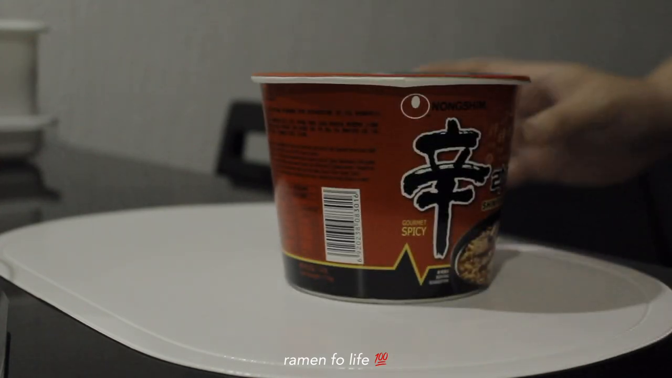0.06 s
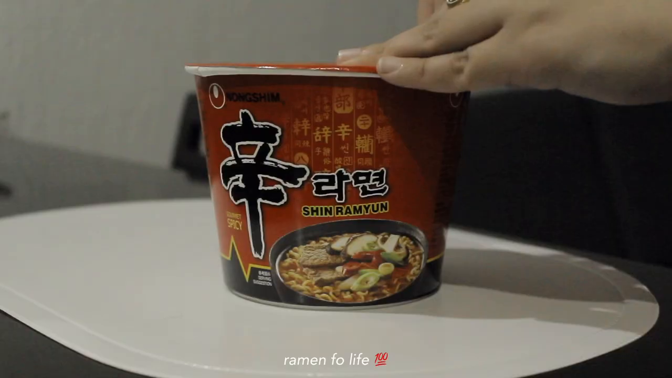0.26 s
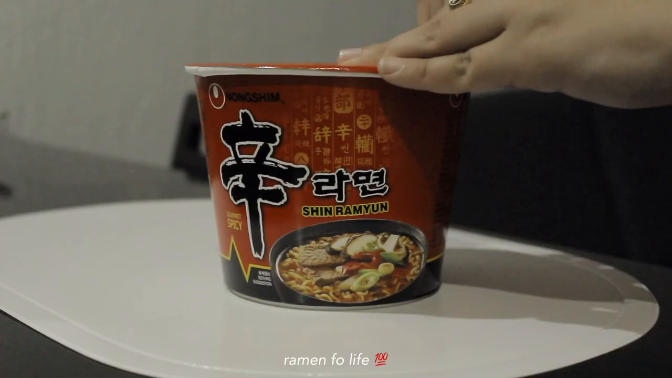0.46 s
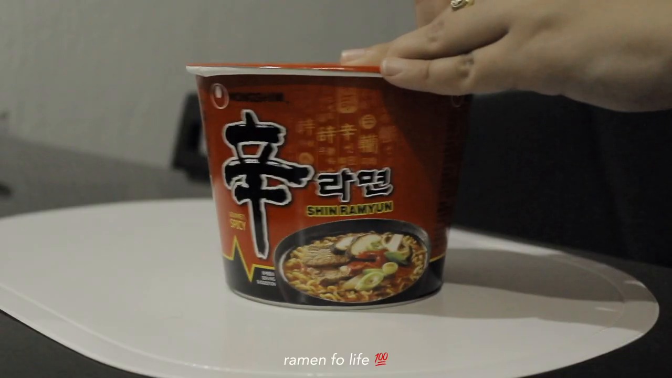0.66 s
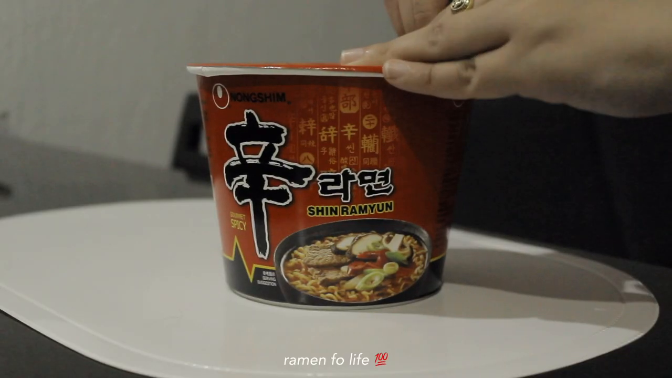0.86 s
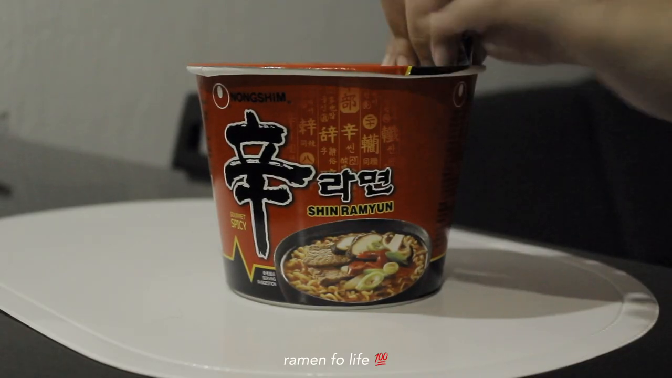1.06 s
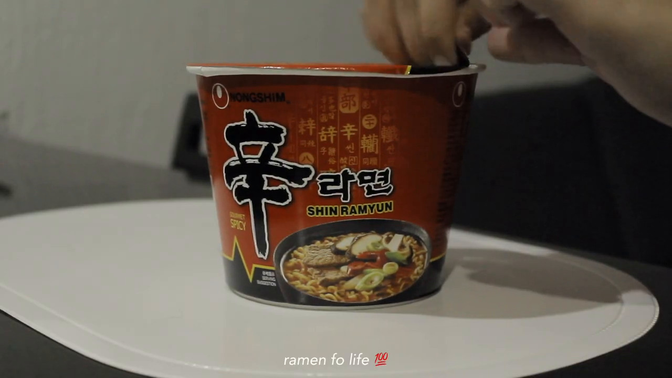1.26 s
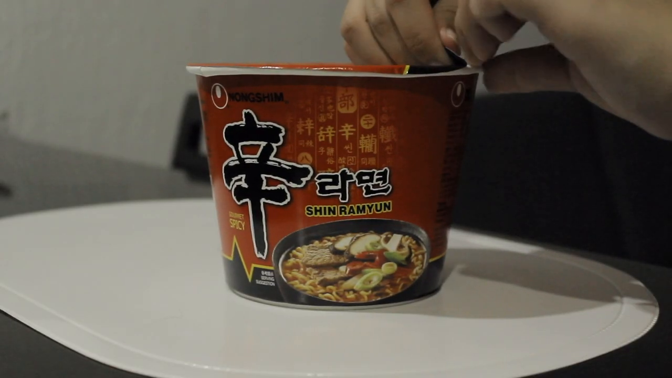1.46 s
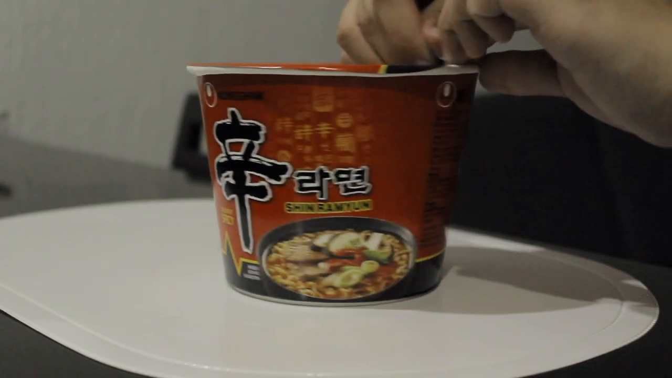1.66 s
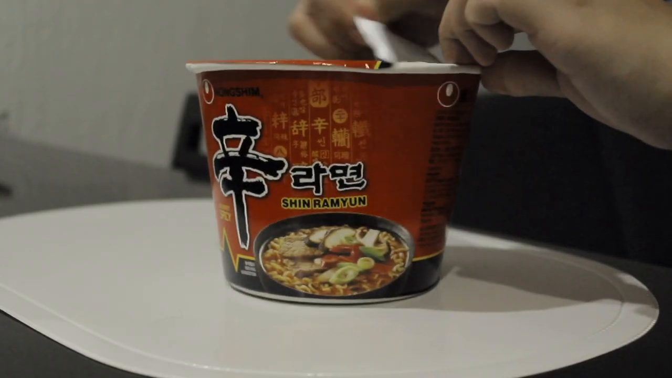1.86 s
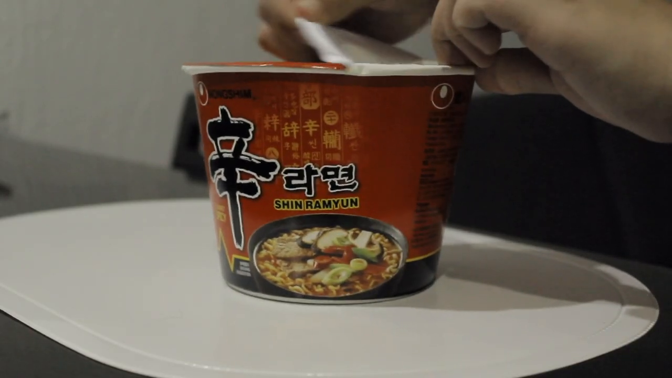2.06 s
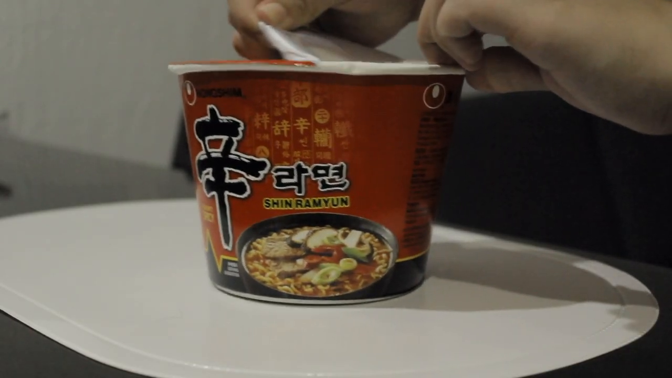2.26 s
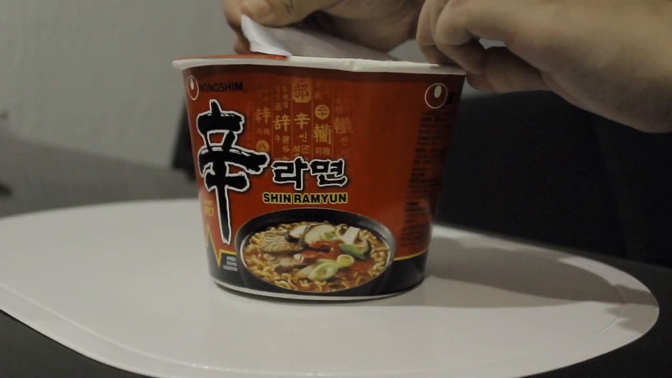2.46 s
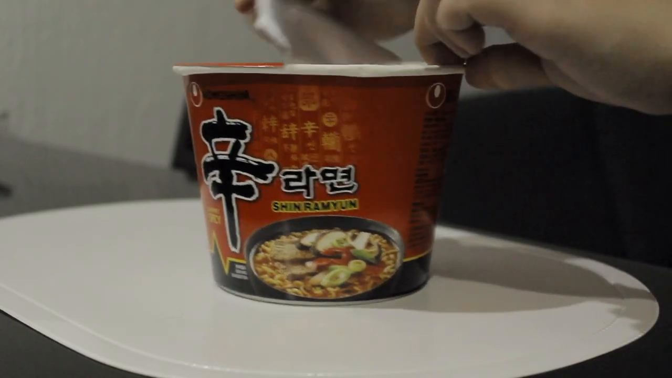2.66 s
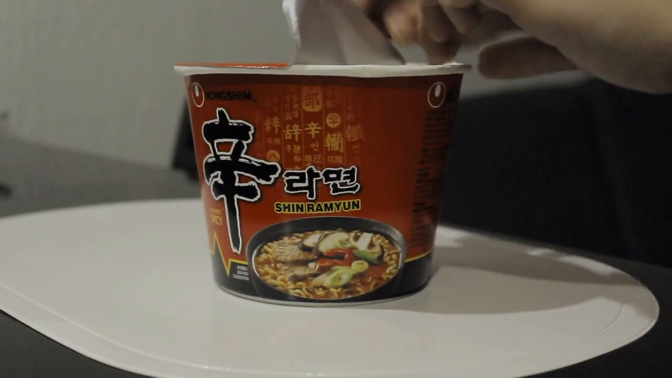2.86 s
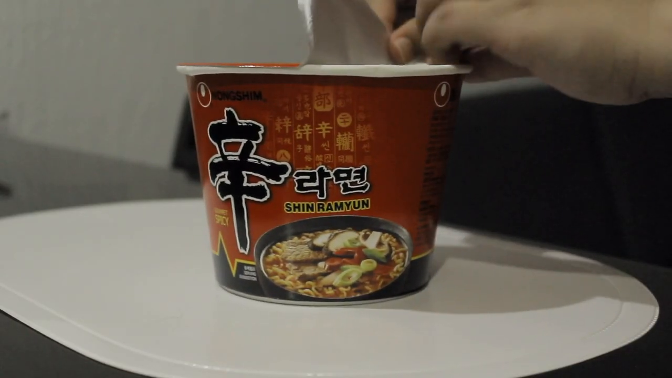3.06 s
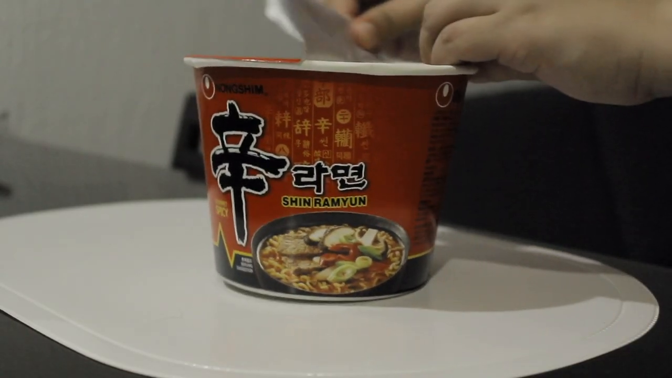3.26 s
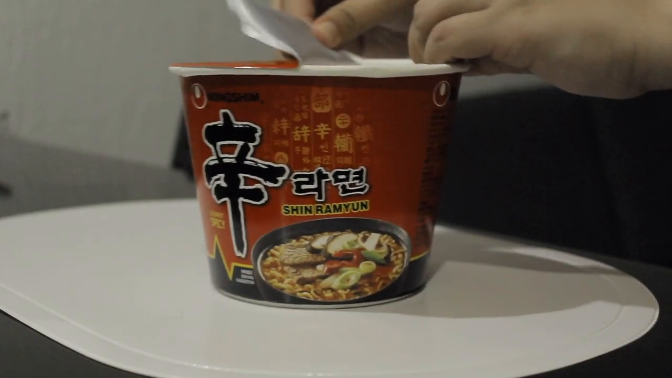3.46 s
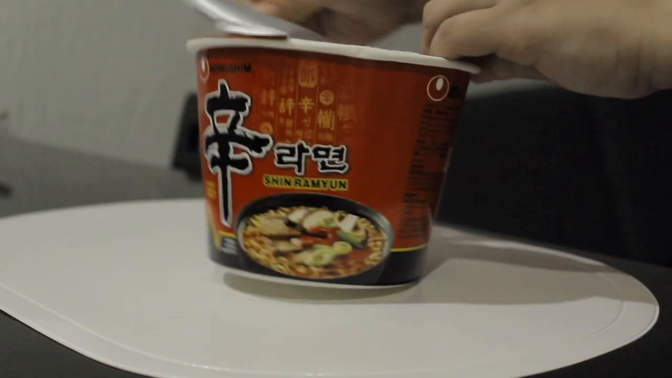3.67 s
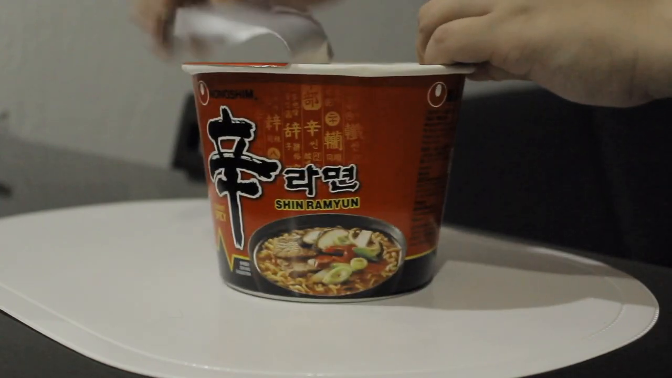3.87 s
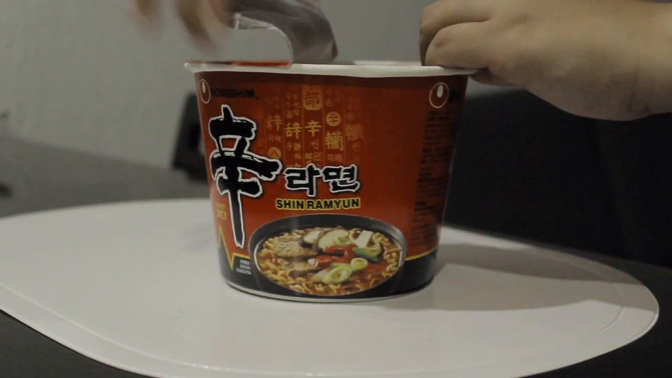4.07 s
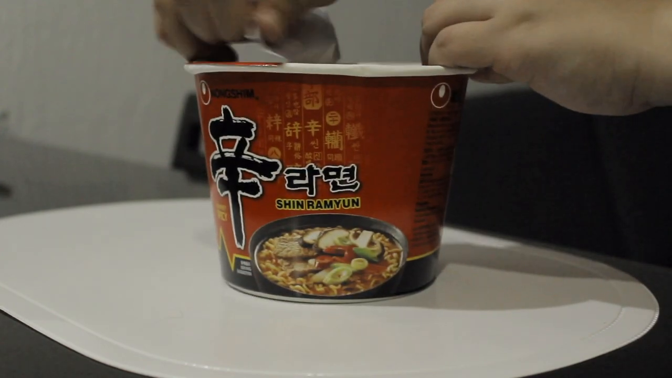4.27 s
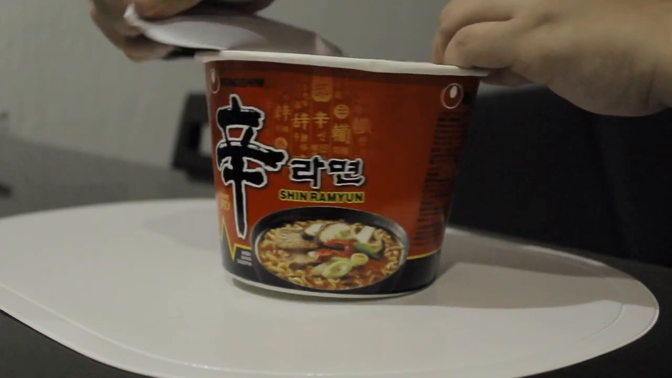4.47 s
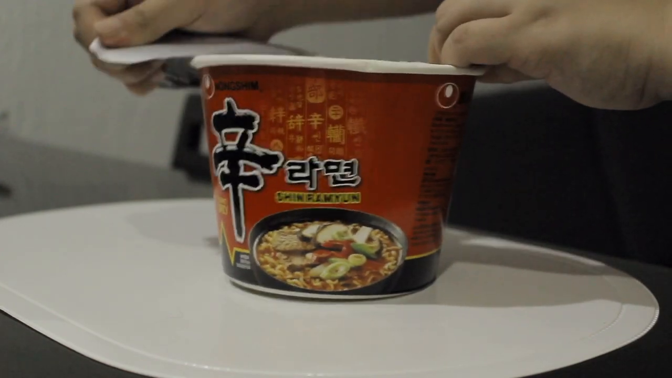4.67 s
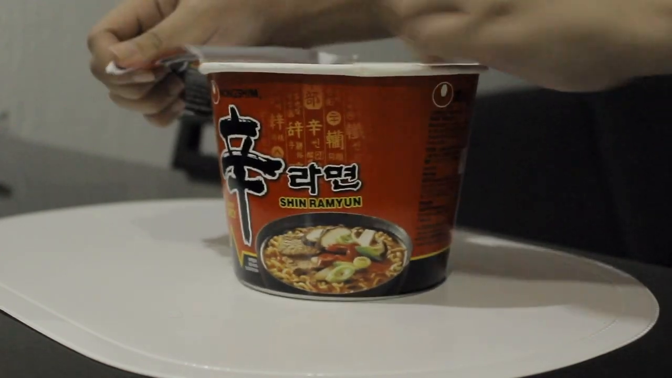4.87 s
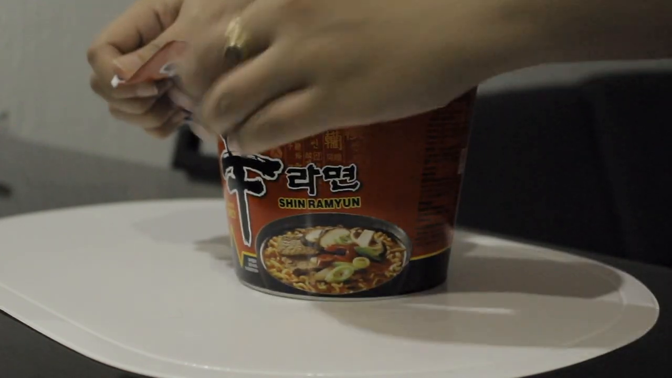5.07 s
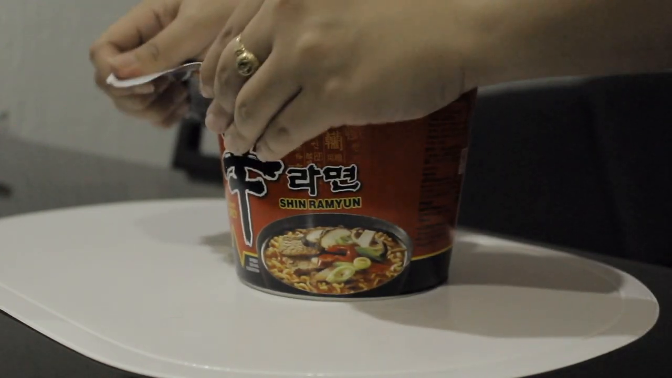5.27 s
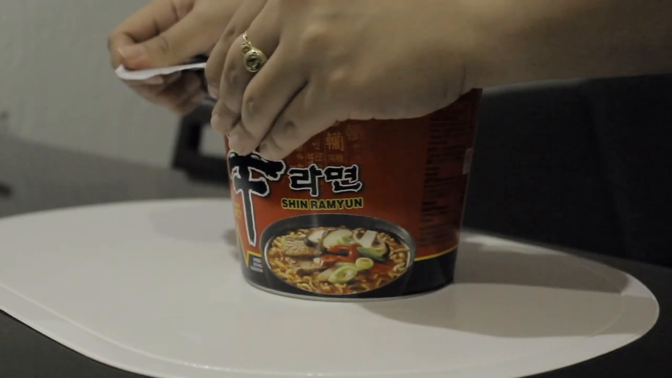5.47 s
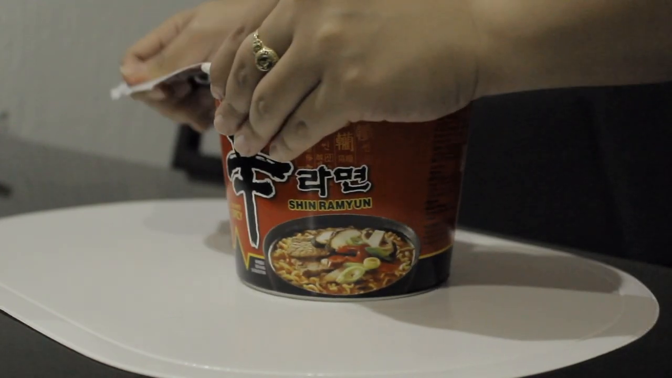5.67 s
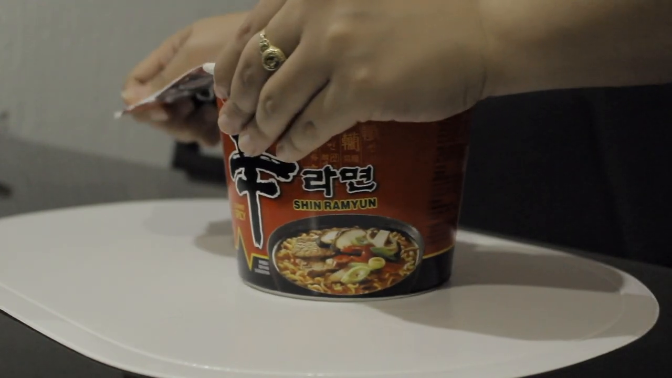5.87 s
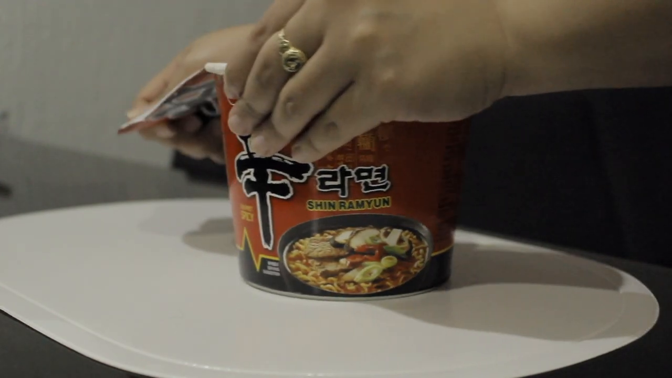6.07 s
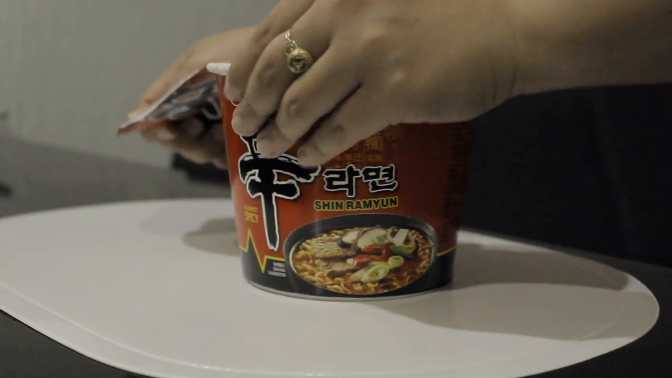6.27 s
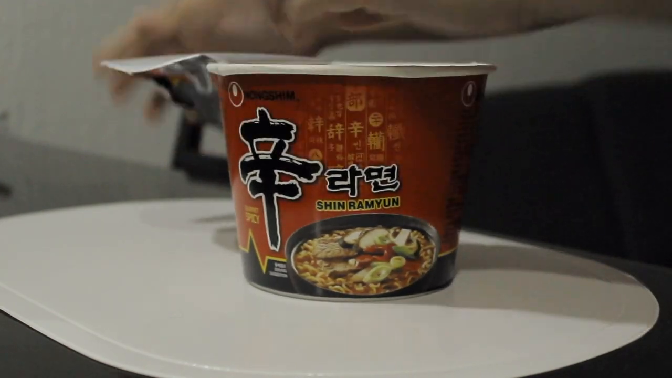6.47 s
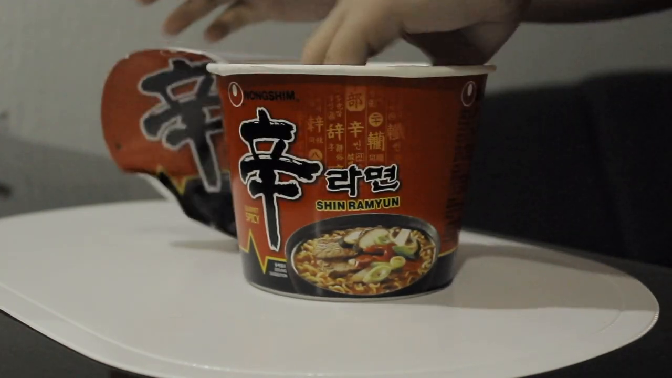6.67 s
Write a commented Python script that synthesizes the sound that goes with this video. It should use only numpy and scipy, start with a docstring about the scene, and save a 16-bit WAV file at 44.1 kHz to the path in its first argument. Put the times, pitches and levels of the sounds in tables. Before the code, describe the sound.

Hands press and peel the lid off a hollow paper noodle cup, with sharp snaps, soft thuds, scraping drags and foil crinkles in a small room.

```python
"""A hollow paper noodle cup sounds as hands press on it and peel its glued foil lid back, in a small hard room.
The seal lets go in snaps, and in drags of tiny random slips that ring the cup's damped modes.
The cup flexes in soft thuds; foil crinkles, rustles and slides as filtered clicks and noise;
one pop, a wavering sine, rings on briefly near 2 kHz.
After a short silence all fades in quickly, over a hiss, a low hum and faint thin tones of narrow-band noise."""
import sys
import numpy as np
from scipy import signal
from scipy.fft import rfft, irfft
from scipy.io import wavfile

SR = 44100
rng = np.random.default_rng(int(sys.argv[2]) if len(sys.argv) > 2 else 0)


def inscribe(sig):
    """Save sig as 16-bit PCM at rate SR to the path in sys.argv[1].

    A 1-D sig is mono; a 2-D sig holds one channel per row.
    Samples are clipped to [-1, 1] before scaling.
    """
    pcm = np.round(np.clip(np.atleast_2d(sig).T, -1, 1) * 32767)
    wavfile.write(sys.argv[1], SR, pcm.astype(np.int16))


N = 296790

# Modes of the cup's air and base: f/Hz, relative level/dB, t60/s
HOLLOW = [(152, -4, 0.053), (265.6, -1.5, 0.14), (312.4, 0, 0.057), (385, 2, 0.068), (420, -1, 0.089),
          (470.3, 3.5, 0.048), (540, -2, 0.17), (600, 1.5, 0.055), (651.4, 4, 0.043), (695.5, 4, 0.025),
          (773, 0.5, 0.07), (886.7, -3, 0.067), (1040, 3.5, 0.029)]
# Modes of the stiff paper wall and lid, the high ones damped sooner: f/Hz, relative level/dB, t60/s
WALL = [(hz, db, 0.017 * (1200 / hz) ** 1.05) for hz, db in [ (1170, 4), (1370, 2), (1650, 0.5),
        (1810, 2.5), (2030, -1.5), (2280, -3), (2550, -2.0), (2850, -1.0), (3200, -14.5), (3600, -5.5),
        (4100, -8), (4700, -2), (5400, -8.5), (6300, -14)]]
# Spectrum of moving foil: f/Hz, relative spectral level/dB
FOIL = [(1760, -8), (3000, -5.5), (3420, -0.5), (4370, -6), (5020, -6.5), (5790, -8.5), (8990, -8),
        (15400, -40.5)]


def amp(db):
    """Level definition: a gain is ten to the power of dB over 20."""
    return 10 ** (np.asarray(db) / 20)


def rms_one(x):
    """Normalization: the mean power is brought to 1."""
    return x / np.sqrt(np.mean(x ** 2) + 1e-20)


def at_hz(points, hz):
    """Logarithmic frequency scale: (Hz, value) rows are interpolated along it."""
    table_hz, values = np.array(points).T
    return np.interp(np.log(hz + 1), np.log(table_hz), values)


def colour(x, spectrum):
    """Linear filtering: each frequency component is weighted by (Hz, dB) rows."""
    gain_db = at_hz(spectrum, np.fft.rfftfreq(len(x), 1 / SR))
    return irfft(rfft(x) * amp(gain_db), len(x))


def drift(rate_hz):
    """Low-passed noise: two equal poles make a random wander of rms 1."""
    r = np.exp(-2 * np.pi * rate_hz / SR)
    wander = signal.lfilter([1], [1, -2 * r, r * r], rng.standard_normal(N + SR))
    return rms_one(wander[SR:])   # the filter's first second is left out


def ring(force, hz, t60):
    """Damped resonance: a unit click sets off a decaying sine of height about 1."""
    r = amp(-60 / (max(t60, .003) * SR))
    w = 2 * np.pi * hz / SR
    return signal.lfilter([0, np.sin(w)], [1, -2 * r * np.cos(w), r * r], force + 1e-18)


def slips(per_s, spread_db, clump_db, clump_rate):
    """Stick-slip friction: clicks of random time, size and sign, their strength wandering in clumps."""
    sizes = amp(spread_db * np.minimum(rng.exponential(1, N), 4)) * rng.choice([-1, 1], N)
    happens = rng.random(N) < per_s / SR
    return sizes * happens * amp(clump_db * drift(clump_rate))


def rubbed(modes, force, weight_db, level_db):
    """Modal excitation by friction: each slip falls at random to one mode of the body."""
    dealt = rng.integers(0, len(modes), N)
    weights = amp(weight_db + np.array(modes)[:, 1])
    # Longer rings hold more energy; the energy stays even as the weights move
    energy = np.sum(weights ** 2 * np.array(modes)[:, 2], axis=1, keepdims=True)
    weights = weights / np.sqrt(energy)
    total = 0
    for k, (hz, _, t60) in enumerate(modes):
        total = total + ring(force * (dealt == k) * weights[:, k], hz, t60)
    return amp(level_db) * rms_one(total)


def struck(modes, s, blow_db, ms, scatter_db, neighbour):
    """Modal excitation by impact: a brief push at each mode's frequency drives it; blow_db is blows x modes."""
    luck = rng.standard_normal((len(s), len(modes)))
    forces = np.zeros((len(modes), N + SR))
    hz, db, t60 = np.transpose(modes)
    signs = neighbour ** np.arange(len(hz))   # a negative ratio drives neighbours in opposite ways
    for row, at in enumerate((s * SR).astype(int)):
        push = np.hanning(int(np.clip(ms[row], .3, 50) * SR / 1000) + 2)
        chatter = np.cos(2 * np.pi * hz[:, None] * np.arange(len(push)) / SR)
        size = amp(blow_db[row] + db + scatter_db * luck[row]) * signs
        forces[:, at:at + len(push)] += size[:, None] * chatter * push / push.sum()
    return sum(ring(force[:N], f, t) for force, f, t in zip(forces, hz, t60))


def off_pitch(modes, hz, db_per_octave):
    """Selective excitation: modes get weaker (dB, one column each) by their octaves from the driven pitch."""
    octaves = np.log2(np.array(modes)[:, 0] / np.asarray(hz)[:, None])
    return -db_per_octave * np.abs(octaves)


def swells(s, swell_ms, hold_ms, fade_ms):
    """Exponential envelope: straight slopes in dB, one row per stroke at every 64th sample."""
    ms = 1000 * (np.arange(0, N + 64, 64) / SR - s)
    before = -ms / np.maximum(swell_ms, 5)
    after = (ms - hold_ms) / np.maximum(fade_ms, 5)
    return -20 * np.clip(np.maximum(before, after), 0, 12)   # 20 dB per swell or fade time


def every_sample(curve):
    """Linear interpolation: a curve given at every 64th sample is filled in."""
    return np.interp(np.arange(N) / 64, np.arange(len(curve)), curve)


def strokes():
    """Incoherent addition: stroke powers add up, and each pitch counts by its drag power."""
    # Pulls and rubs of a hand: full force at t/s, swell/ms, hold/ms, fade/ms, cup drag level/dB,
    # wall scrape level/dB, foil rustle level/dB, pitch where the hollow is driven most f/Hz
    pulls = [(0.2, 40, 10, 180, -50.5, -71, -82, 457), (0.42, 42, 5, 165, -41.5, -45, -67, 370),
             (0.633, 29, 11, 83, -29.5, -31.5, -33.5, 363), (0.75, 120, 15, 180, -43.5, -52, -53, 366),
             (0.885, 45, 8.7, 150, -43.5, -41, -55, 335), (1.15, 610, 57, 240, -46.5, -52.5, -55.5, 388),
             (1.33, 87, 10, 120, -43.5, -48, -69, 395), (1.48, 100, 9.1, 150, -49, -69, -66, 368),
             (1.66, 165, 4.5, 81, -43.5, -42.5, -49.5, 350), (1.766, 46, 15, 46, -27, -30, -34, 380),
             (1.8, 45, 22, 180, -26.5, -34.5, -43, 524), (1.96, 210, 10, 120, -34.5, -45, -48.5, 580),
             (2.027, 46, 9.8, 64, -20.5, -32, -37.5, 426), (2.13, 45, 150, 230, -38, -52, -50, 440),
             (2.28, 160, 5, 150, -35, -45.5, -53, 550), (2.36, 35, 34, 164, -29, -38, -44, 487),
             (2.58, 600, 63, 120, -50, -52, -52, 425), (2.72, 120, 97, 190, -44.5, -61, -71, 490),
             (2.87, 93, 84, 180, -49, -45.5, -52, 440), (3.19, 85, 9.2, 180, -40.5, -46, -51, 457),
             (3.32, 260, 10, 126, -38, -43.5, -66, 540), (3.39, 130, 5, 140, -49.5, -51.5, -47, 440),
             (3.551, 11, 8.1, 32, -24, -28.5, -41, 473), (3.58, 15, 15, 120, -31, -53, -39.5, 570),
             (3.64, 180, 126, 110, -39.5, -43, -46.5, 674), (3.819, 60, 20, 110, -40.5, -40, -43.5, 530),
             (4.113, 24, 4.4, 65, -29.5, -35, -42, 420), (4.28, 36, 108, 120, -32.5, -40.5, -45, 536),
             (4.37, 130, 12, 100, -31.5, -32, -47, 540), (4.43, 80, 26, 100, -30.5, -46, -60, 420),
             (4.59, 360, 57, 91, -32.5, -45, -57, 520), (4.66, 90, 24, 76, -32, -36.5, -47.5, 420),
             (4.819, 43, 8.5, 93, -38, -39.5, -44, 355), (5.2, 290, 15, 150, -65, -50.5, -54, 540),
             (5.48, 42, 23, 76, -33, -41, -55, 510), (5.54, 100, 32, 120, -25.5, -43, -60, 556),
             (5.599, 240, 33, 102, -24.5, -30.5, -44, 636), (5.96, 99, 18, 157, -30.5, -36.5, -43.5, 537),
             (6.3, 42, 4.1, 65, -43, -51, -44, 576), (6.42, 91, 8.8, 44, -51, -63, -74, 510),
             (6.619, 23, 10, 48, -39, -45.5, -43.5, 500), (6.66, 55, 6.7, 110, -52, -47, -48, 500),
             (6.72, 49, 10, 60, -49, -65, -43.5, 450)]
    touch_db = (-68, -70, -73)   # the hands never quite rest: cup, wall, foil
    s, swell_ms, hold_ms, fade_ms, *levels_db, hz = np.transpose(pulls)[:, :, None]
    shape_db = swells(s, swell_ms, hold_ms, fade_ms)
    powers = [amp(2 * (db + shape_db)) for db in levels_db]
    curves = [10 * np.log10(p.sum(axis=0) + amp(2 * rest_db)) for p, rest_db in zip(powers, touch_db)]
    curves.append(np.sum(powers[0] * hz, axis=0) / powers[0].sum(axis=0))
    return [every_sample(curve) for curve in curves]


def hands():
    """Stick-slip friction: glue drags on the rim, fingers scrape the wall and the foil rustles."""
    drag_db, scrape_db, rustle_db, hz = strokes()
    grip = slips(per_s=3000, spread_db=3, clump_db=0.0, clump_rate=110)
    drag = rubbed(HOLLOW, grip, off_pitch(HOLLOW, hz, db_per_octave=5.5), drag_db)
    # The drag shakes the table top under the cup, 25.5 dB weaker
    table = amp(drag_db - 25.5) * rms_one(ring(grip, hz=118.4, t60=0.077))
    grain = slips(per_s=6000, spread_db=3.5, clump_db=1.5, clump_rate=82)
    scrape = rubbed(WALL, grain, np.zeros((1, len(WALL))), scrape_db)
    folds = colour(slips(per_s=6600, spread_db=2.0, clump_db=2.0, clump_rate=150), FOIL)
    rustle = amp(rustle_db) * rms_one(folds)
    return drag + table + scrape + rustle


def background():
    """Narrow-band noise: a steady hiss, and noise through paired resonances as a hum and thin tones."""
    # Spectrum of the hiss: f/Hz, relative spectral level/dB
    hiss_spectrum = [(12, -27), (20, -4), (49, 5), (306, 7), (451, 4), (744, -0.5), (1490, -4),
                     (1920, -4.5), (2400, -4), (4420, -9.5), (7710, -13), (14200, -29), (15400, -36)]
    # Wavering hum and thin tones: f/Hz, bandwidth/Hz, rms level/dB
    thin_tones = [(58, 13, -68), (7340, 36, -79), (10800, 29, -80), (12600, 25, -84), (14300, 25, -88)]
    hiss_db = -52   # rms
    out = amp(hiss_db) * rms_one(colour(rng.standard_normal(N), hiss_spectrum))
    for hz, width_hz, db in thin_tones:
        t60 = np.log(1000) / (np.pi * width_hz)
        once = ring(rng.standard_normal(N), hz, t60)
        out = out + amp(db) * rms_one(ring(once, hz, t60))
    return out


def room(x):
    """Diffuse reverberation: after a short gap come dense echoes with a decay time for each octave."""
    # Reverberation time of the room: f/Hz, t60/s
    decay_times = [(200, 0.46), (1000, 0.33), (3000, 0.67), (8000, 0.26)]
    level_db, gap_s = -9, 0.0023
    t = np.arange(SR // 2) / SR
    edges = 100 * 2. ** np.arange(8)
    echoes = 0
    for low, high in zip(edges, edges[1:]):
        octave = signal.butter(2, [low, high * 1.2], "band", fs=SR, output="sos")
        band = signal.sosfilt(octave, rng.standard_normal(len(t)))
        echoes = echoes + band * amp(-60 * t / at_hz(decay_times, np.sqrt(low * high)))
    echoes = echoes * np.clip(t / gap_s - 1, 0, 1)   # silent gap, then an equally long rise
    echoes = echoes / np.sqrt(np.sum(echoes ** 2))
    return amp(level_db) * signal.fftconvolve(x, echoes)[:N]


def flexes():
    """Narrow-band excitation: a slow push of a finger reaches mainly the hollow's modes near its pitch."""
    # Soft thuds of the flexing cup: t/s, relative level/dB, pitch f/Hz, time to give/ms
    pushes = [(0.182, -39, 432, 5.7), (0.379, -36, 370, 7.7), (0.675, -22, 385, 9.1),
              (0.711, -20, 374, 3.1), (0.916, -16.5, 317, 7.1), (1.257, -34, 254, 6.3),
              (1.363, -29.5, 397, 5.2), (1.509, -23.5, 363, 2.5), (1.677, -7.5, 278, 5),
              (2.017, -9.5, 380, 5.6), (2.028, -18, 637, 4.1), (2.049, -22.5, 643, 6.4),
              (2.363, -20.5, 487, 13.6), (3.475, -21.5, 263, 20), (3.545, -10.5, 334, 14),
              (3.589, -25, 610, 5.9), (3.617, -15.5, 686, 14.4), (4.297, -20, 506, 13),
              (4.354, -21, 850, 8.1), (4.611, -17.5, 523, 3.4), (4.664, -14, 252, 11),
              (4.823, -25, 330, 4.9), (5.456, -45, 610, 3), (5.487, -22, 510, 2), (5.54, -28.5, 700, 7.2),
              (5.579, -14, 840, 16), (5.612, -15, 836, 3.5), (5.644, -19.5, 490, 8.8),
              (5.964, -24, 496, 5.1), (5.999, -28, 510, 7), (6.528, -36.5, 650, 2), (6.609, -26, 273, 11),
              (6.632, -33.5, 630, 3.5)]
    s, level_db, hz, ms = np.transpose(pushes)
    thud_db = level_db[:, None] - 3.0 + off_pitch(HOLLOW, hz, db_per_octave=41)
    return struck(HOLLOW, s, thud_db, ms, scatter_db=1.5, neighbour=-1.144)


def snaps():
    """Impulsive release: a hollow knock, a ring of the wall near its own pitch and a short foil crack."""
    # Snaps of seal or lid: t/s, relative level/dB, pitch where the hollow is driven most f/Hz,
    # the same for the wall f/Hz, wall ring re snap level/dB, foil crack re snap level/dB
    releases = [(0.36, -3, 334, 1480, -10.5, -23.5), (0.363, -13.5, 704, 2560, -6, -39),
                (0.61, -27.5, 580, 1220, -3.5, -21), (0.637, -17, 400, 1170, -10.5, -9.5),
                (0.854, -11, 450, 1060, -18, -28), (0.859, -9, 312, 1100, -7.5, -31),
                (0.916, -30, 326, 1770, 1, -17), (1.417, -14, 315, 1200, -40, -45),
                (1.43, -20.5, 420, 1210, -35, -49), (1.624, -7, 421, 1820, -11, -21),
                (1.676, -14, 600, 1290, -15, -38), (1.808, -10.5, 605, 1860, -4.5, -8),
                (1.821, -16.5, 600, 2370, 1, -31), (1.913, -3.5, 707, 1320, -14.5, -28),
                (2.193, -17.5, 650, 1240, -8, -42), (2.248, -31, 585, 1120, -3.5, -12),
                (2.29, -8.5, 678, 1050, -8.5, -36), (2.469, -21, 473, 1240, -11.5, -19),
                (2.677, -12.5, 638, 1090, -13, -44), (2.777, -33, 560, 1650, -6.5, -11),
                (2.816, -27.5, 653, 1180, -3, -12), (3.148, -15.5, 626, 1280, -23, -41),
                (3.266, -10, 637, 1110, -14, -45), (3.565, -17, 345, 1700, 6.5, 6.5),
                (3.577, -20.5, 610, 3500, -3, 0.5), (3.832, -24, 620, 1110, -11, -18),
                (4.089, -9, 454, 1150, -14.5, -17), (4.112, -31.5, 617, 1130, -2, -16),
                (4.162, -27.5, 245, 1960, -1.5, -17), (4.251, -19, 644, 1050, -14, -22),
                (4.265, -12, 580, 1180, -32, -32), (4.586, -15, 540, 1190, -28, -34),
                (6.304, -42, 590, 2950, 5, -17), (6.371, -27.5, 705, 2580, -8.5, -11),
                (6.695, -42, 272, 2600, -4, 0)]
    s, level_db, hollow_hz, wall_hz, wall_db, foil_db = np.transpose(releases)
    ms = np.full(len(s), 1.63)   # push on the wall; the hollow's is longer

    focus_db = off_pitch(HOLLOW, hollow_hz, db_per_octave=54.5)
    knock_db = level_db[:, None] + 0.5 + np.maximum(focus_db, -17)   # far modes still get a small share
    knock = struck(HOLLOW, s, knock_db, 2.86 * ms, scatter_db=3, neighbour=0.98)

    snap_db = (level_db + wall_db + 4.5)[:, None] + off_pitch(WALL, wall_hz, db_per_octave=11.5)
    wall = struck(WALL, s, snap_db, ms, scatter_db=2.5, neighbour=-1.079)

    kicks = np.zeros(N)
    kicks[(s * SR).astype(int)] = amp(level_db + foil_db + 1.5)
    fading = signal.lfilter([1], [1, -amp(-60 / (0.03 * SR))], kicks + 1e-18)   # t60 0.03 s
    # A fold is duller than a rustle
    dull = signal.butter(3, 6500, fs=SR, output="sos")
    fizz = signal.sosfilt(dull, colour(rng.standard_normal(N), FOIL))
    soften = signal.butter(2, 9000, fs=SR, output="sos")
    crack = signal.sosfilt(soften, fading * rms_one(fizz))
    return knock + wall + crack


def crinkles():
    """Impulsive noise: each crease of foil is a burst of band-passed noise that dies exponentially."""
    # Thin bright ticks of foil: t/s, level before the band-pass/dB
    creases = [(0.809, -43), (0.918, -36), (1.2007, -41), (1.7554, -31), (2.1345, -44), (2.141, -37),
               (2.3007, -34), (2.3531, -41), (2.5027, -38), (2.5394, -35), (3.5445, -37), (3.8147, -29),
               (4.2647, -37), (4.3287, -25), (5.435, -41), (6.289, -42), (6.3705, -29), (6.6154, -41),
               (6.6737, -38), (6.695, -36), (6.7151, -34)]
    t60_s, low_hz, high_hz = 0.0086, 5950, 11100
    s, level_db = np.transpose(creases)
    kicks = np.zeros(N)
    kicks[(s * SR).astype(int)] = amp(level_db)
    fading = signal.lfilter([1], [1, -amp(-60 / (t60_s * SR))], kicks + 1e-18)
    band = signal.butter(2, [low_hz, high_hz], "band", fs=SR, output="sos")
    return signal.sosfilt(band, fading * rng.standard_normal(N))


def slides():
    """Sliding friction: fine grains of foil on foil merge into a thin high hiss."""
    # Slides of loose foil: full force at t/s, swell/ms, hold/ms, fade/ms, level/dB
    glides = [(2.03, 61, 24, 28, -41), (2.13, 80, 130, 110, -52), (2.38, 54, 110, 30, -53.5),
              (2.62, 80, 50, 92, -62), (2.85, 29, 18, 60, -58), (2.95, 80, 16, 40, -53.5),
              (3.81, 30, 15, 50, -48.5), (3.865, 40, 13, 21, -50), (4.33, 51, 30, 80, -50),
              (5.46, 68, 30, 60, -56)]
    # Spectrum of the sliding foil: f/Hz, relative spectral level/dB
    slide_spectrum = [(4000, -30), (7000, 4), (9000, 2), (10500, -3), (12000, -9.5), (14000, -16),
                      (15400, -27)]
    *shape, db = np.transpose(glides)[:, :, None]
    clicks = slips(per_s=5000, spread_db=-3.5, clump_db=3.5, clump_rate=76)
    grains = rms_one(colour(clicks, slide_spectrum))
    return every_sample(amp(db + swells(*shape)).sum(axis=0)) * grains


def pop():
    """Frequency and amplitude modulation: a pop's short, rough ring wavers in pitch and level."""
    # Path of the pop's ring: t/s, f/Hz, level/dB, the last two before the wavering
    path = [(4.160, 1970, -64), (4.167, 1990, -34), (4.172, 2280, -40), (4.19, 2130, -34),
            (4.21, 2100, -60)]
    s, hz, db = np.transpose(path)
    t = np.arange(N) / SR
    pitch_hz = np.interp(t, s, hz) * (1 + 0.092 * drift(240))
    phase = 2 * np.pi * np.cumsum(pitch_hz) / SR
    level_db = np.interp(t, s, db, left=-200, right=-200) + 5.1 * drift(200)
    return amp(level_db) * np.sin(phase)


def scene():
    """Superposition: the cup's sounds, their echoes and the background add up."""
    sources = hands() + flexes() + snaps() + crinkles() + slides() + pop()
    # The cup is too small to radiate well below 140 Hz
    radiation = signal.butter(3, 140, "high", fs=SR, output="sos")
    cup = signal.sosfilt(radiation, sources)
    return (cup + room(cup) + background())[None]


def record(dry):
    """Saturation and band limiting: silence, a quick fade-in, rounded peaks and a steep treble cut."""
    start_s, fade_s, peak_top, cutoff_hz = 0.179, 0.0064, .85, 15700
    fade = np.clip((np.arange(N) / SR - start_s) / fade_s, 0, 1) ** 2
    rounded = peak_top * np.tanh(dry * fade / peak_top)
    return signal.sosfilt(signal.cheby2(20, 60, cutoff_hz, fs=SR, output="sos"), rounded)


dry = scene()
out = record(dry)
inscribe(out)
```